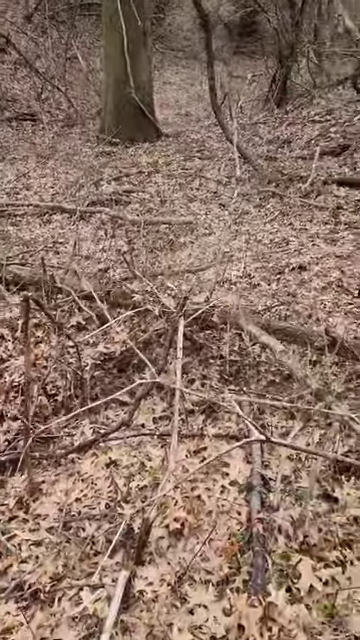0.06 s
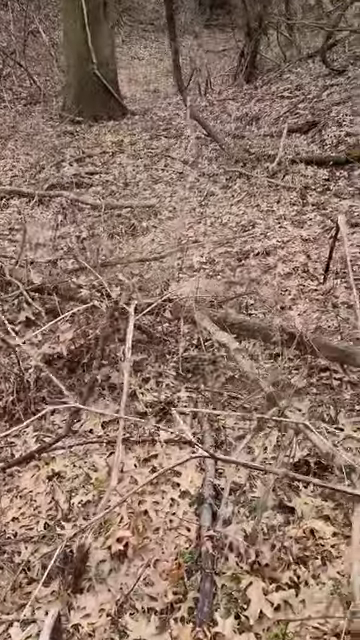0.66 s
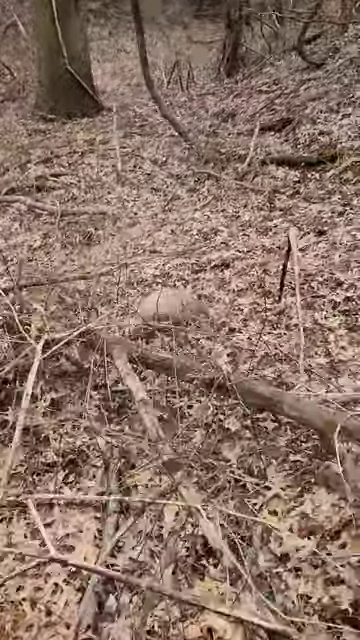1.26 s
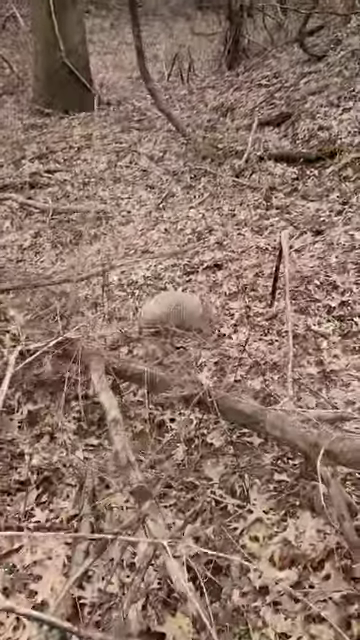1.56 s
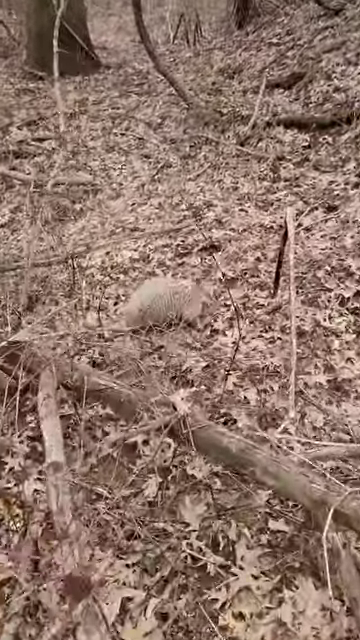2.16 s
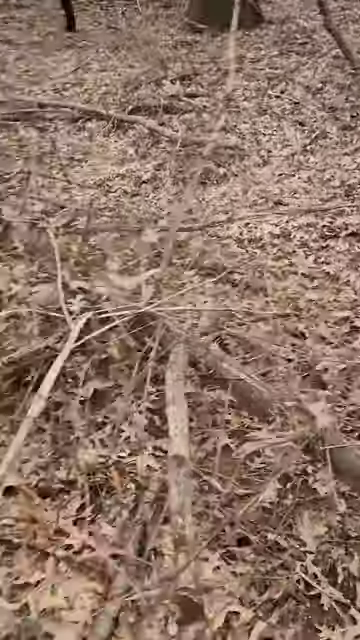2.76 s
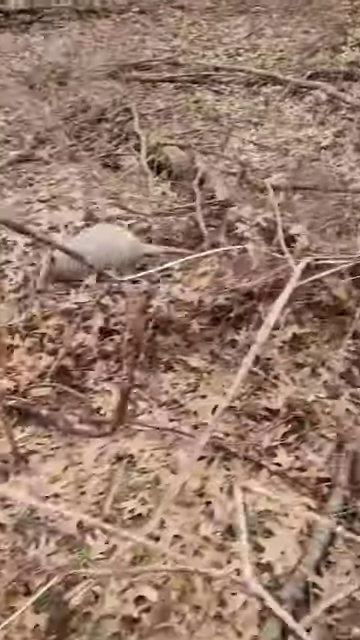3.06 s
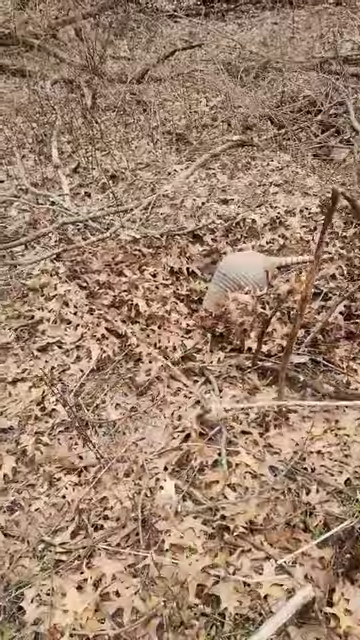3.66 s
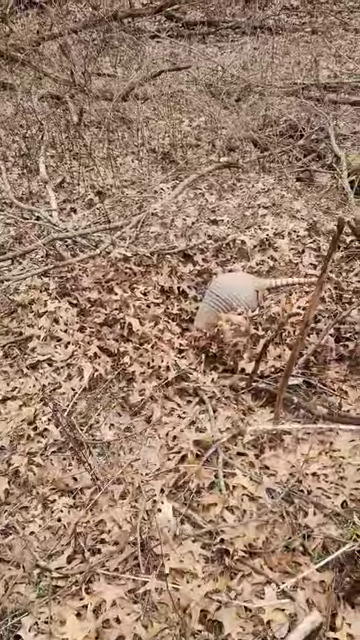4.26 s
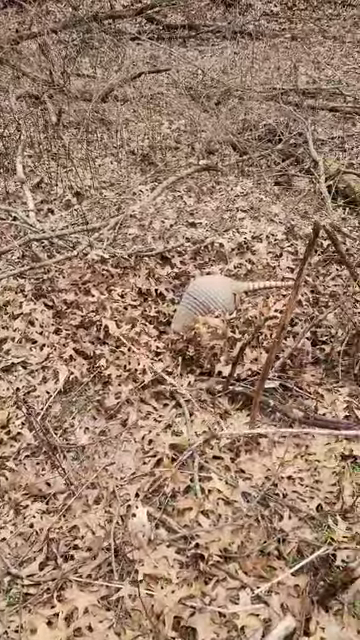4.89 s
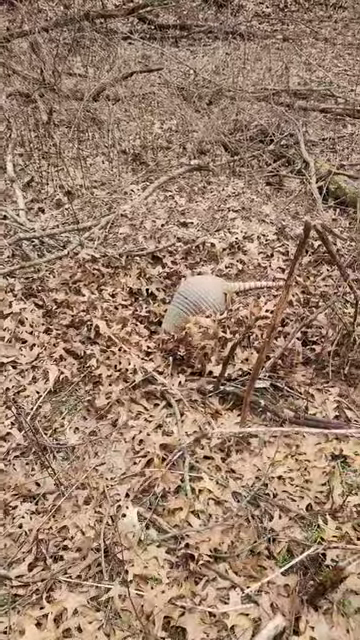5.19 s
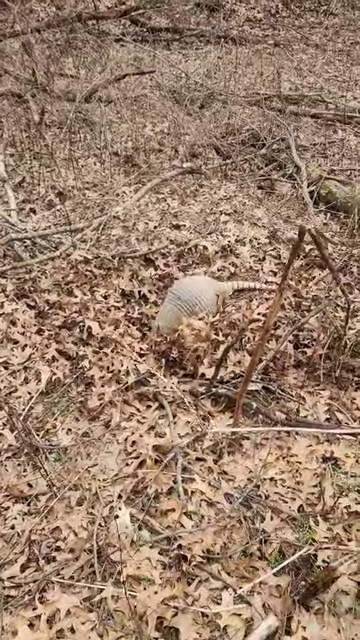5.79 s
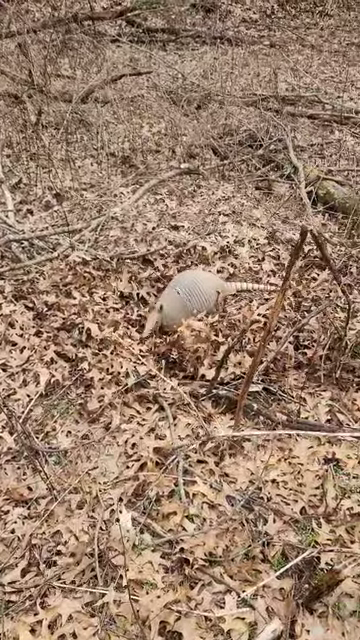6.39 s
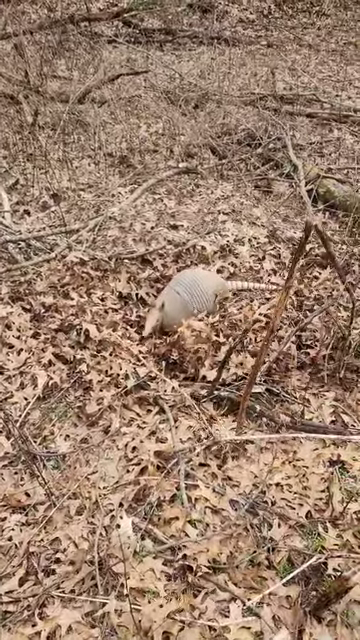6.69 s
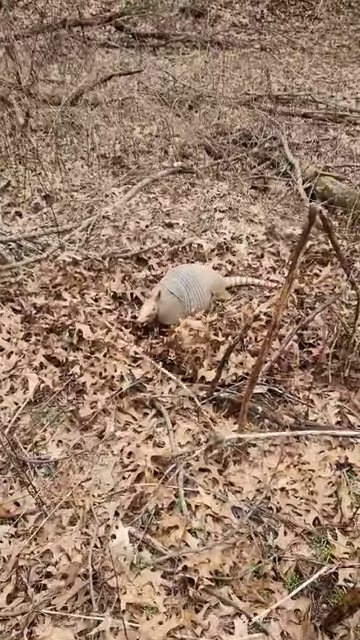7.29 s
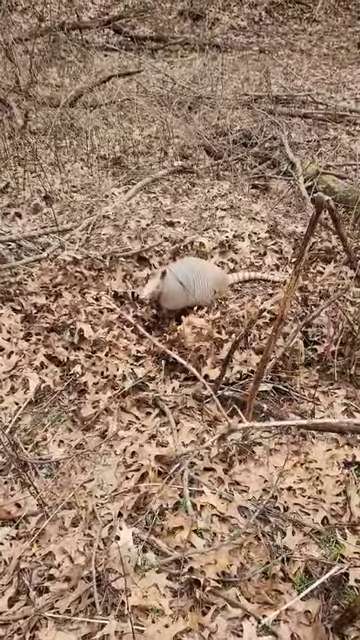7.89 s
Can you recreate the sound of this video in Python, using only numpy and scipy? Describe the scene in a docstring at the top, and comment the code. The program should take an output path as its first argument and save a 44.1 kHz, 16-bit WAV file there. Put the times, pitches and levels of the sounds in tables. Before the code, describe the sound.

In soft woodland air, someone wades through dry leaves right by the microphone, with a crackling hiss, snapping twigs and a few dull thuds. The walking peaks, then halts as a distant bird gives two faint, hoarse calls. Following a quiet pause, an armadillo rustles and scratches in the leaves in a run of quick, dry rasps, slowing slightly. Low rumble and light wind buffeting continue throughout.

```python
"""Dry oak leaves hiss and crunch as someone wades through them, twigs cracking underfoot.
The steps stop near an armadillo, which stirs the litter, then roots in it with short, rasping
thrusts that gradually slow down. The rustle is noise shaped by countless tiny leaf fractures.
A low rumble, puffs of wind and soft woodland air lie under it all, and a far bird calls twice."""
import sys
import numpy as np
from scipy import signal
from scipy.fft import rfft, irfft, next_fast_len
from scipy.io import wavfile
from scipy.ndimage import uniform_filter1d, map_coordinates

SR = 44100
rng = np.random.default_rng(int(sys.argv[2]) if len(sys.argv) > 2 else 0)


def to_wav(s):
    """Save 16-bit WAV."""
    ch = np.atleast_2d(s).T  # columns
    pcm = np.round(np.clip(ch, -1, 1) * 32767)  # PCM
    wavfile.write(sys.argv[1], SR, pcm.astype(np.int16))


N = 354563

# bright crack of a breaking stalk: (frequency [Hz], gain [dB])
CRACK_SPECTRUM = [(2500, -42.5), (4400, -1.5), (6000, -3.5), (7600, 7), (9000, 0.5), (11500, -18.5)]
# low end of the rumble and the wind puffs: (frequency [Hz], gain [dB])
RUMBLE_SPECTRUM = [(15, -37), (28, -1.5), (42, 0.5), (78, 2.5), (115, -4), (155, -12), (230, -29.5),
                   (400, -66)]
# slow drift of the ambience: (time [s], air level [dB], rumble level [dB])
AMBIENCE_LEVELS = [(0, -56, -41.5), (1.3, -57, -44), (2.5, -56.5, -46), (4.7, -59, -45), (8, -57, -43)]


def wading():
    """Feet sweep through the leaves: a crackling hiss, and a lower crunch as the layer is pressed."""
    # feet brushing leaves aside: (time at full strength [s], hold [s], level [dB])
    sweeps = [(0.0, 0.22, -47.5), (.19, 0.16, -39), (.48, 0.0067, -49), (.66, 0.095, -45.5),
              (.885, 0.11, -36), (1.07, 0.095, -40), (1.3, 0.11, -44), (1.46, .01, -40.5),
              (1.565, 0.089, -40.5), (1.81, 0.038, -40.5), (1.89, 0.094, -33), (2.05, 0.065, -36.5),
              (2.23, 0.0091, -35.5), (2.298, 0.012, -26.5), (2.47, 0.1, -29), (2.64, 0.038, -23.5),
              (2.74, 0.058, -31), (2.89, 0.16, -30), (3.115, 0.0069, -29), (3.22, 0.053, -32.5),
              (3.3, .12, -29.5), (3.5, 0.13, -40), (3.68, 0.0048, -34.5), (4.08, .04, -57.5),
              (4.48, 0.21, -64), (4.79, 0.03, -60), (4.98, .09, -57.5), (5.545, 0.0049, -60.5)]
    # weight coming down on the leaves: (time at full strength [s], hold [s], level [dB])
    steps = [(.12, 0.26, -55), (.66, 0.37, -57.5), (1.33, 0.3, -57.5), (1.86, 0.11, -53),
             (2.29, 0.02, -43.5), (2.47, 0.021, -42), (2.72, .32, -38.5), (3.11, 0.015, -37.5),
             (3.29, 0.022, -38.5), (3.45, 0.078, -50), (3.69, 0.024, -55)]
    # where the leaves move: (time [s], direction [0 = ahead, 1 = underfoot])
    directions = [(0, 0.89), (2.25, 0.63), (2.45, 0.046), (2.85, 0.047), (3.1, 0.41), (3.9, 1)]
    # brushed leaves: (frequency [Hz], gain [dB])
    hiss_spectrum = [(500, -14.5), (1500, -6), (2500, -7.5), (3300, -2.5), (5000, -3.5), (6300, -3.5),
                     (9500, -4), (11800, 0), (13700, -2), (15500, -4.5)]
    # pressed leaves: (frequency [Hz], gain [dB])
    crunch_spectrum = [(100, -29), (200, -9.5), (600, -1), (950, -9.5), (1400, -2), (2100, 2), (3200, 2),
                       (6000, -38)]
    arrival_s, fidget_db, dense_db, tilt_db_per_octave = 4.2, -66.5, -29, 2.07
    sweep = amp(pushes(sweeps, rise_db_per_s=239, fall_db_per_s=112, settle_db=-10))
    weight = amp(pushes(steps, rise_db_per_s=216, fall_db_per_s=146, settle_db=-5.5))
    below = np.clip(curves(directions)[0], 0, 1)
    standing = np.arange(N) / SR > arrival_s  # leaves still creak under the resting feet
    fidget = amp(fidget_db) * standing * crackle(rate=24, spread_db=0.5, life_s=0.006, bed=0.53)
    friction = 0.6 + (sweep / amp(dense_db)) ** 2  # strong sweeps merge into an even rush
    grains = crackle(rate=600, spread_db=3.3, life_s=0.00022, bed=friction) * amp(0.8 * wobble(60))
    front_spectrum = [(hz, db + tilt_db_per_octave * np.log2(hz)) for hz, db in hiss_spectrum]
    underfoot = unit(stereo_noise(grains, hiss_spectrum, lag_ms=0.4145, scatter=1.0) * pan(-3))
    in_front = unit(stereo_noise(grains, front_spectrum, lag_ms=-0.051, scatter=0.7) * pan(2.4))
    hiss = np.hypot(sweep, fidget) * (np.sqrt(below) * underfoot + np.sqrt(1 - below) * in_front)
    pressed = crackle(rate=500, spread_db=3.0, life_s=0.0004, bed=1.0)
    crunch = unit(stereo_noise(pressed, crunch_spectrum, lag_ms=0.018, scatter=0.089 + 0.5 * below))
    return spectral_flicker(hiss + weight * crunch, depth_db=2.2)


def twig_snaps():
    """A stalk breaks in about a millisecond; the wood sounds a little longer. Thinner is brighter."""
    # twigs and stalks: (time [s], level [dB], thinness [0 = stick, 1 = splinter], left over right [dB])
    breaks = [(0.051, -46, .65, -8), (0.1084, -32, 0.16, -4.5), (0.2017, -20, 0.54, -12),
              (.215, -27, 0.45, -5.5), (.24, -28.5, 0.84, -7.5), (0.318, -30.5, 0.42, -14),
              (0.8237, -36, 0.96, -14), (1.1028, -18, 0.62, -5), (1.1146, -19, 0.61, -1.5),
              (2.1121, -16.5, 0.69, -11.5), (2.1159, -14.5, 0.53, -6), (2.1301, -12.5, 0.62, -5.5),
              (2.1365, -18, 0.63, -11.5), (2.1517, -14.5, 0.73, -13), (2.1771, -8.5, 0.81, -1.5),
              (2.182, -11.5, 0.66, -1), (2.2485, -17, 1, -1), (2.275, -21, 0.86, -12),
              (2.3581, -15.5, 0.39, -1.5), (2.5313, -19.5, 0.96, 4), (2.8975, -19.5, 0.096, -2.5),
              (2.9, -17.5, 0.95, -3.5), (3.3353, -20, 1, -7), (3.9285, -28, 0.87, -14),
              (4.07, -42, 0.36, -2), (4.0958, -49, .8, -4), (4.681, -46, 0.35, -7.5),
              (4.958, -47, 0.97, -13.5), (5.038, -42.5, 0.69, -8), (5.5013, -44, 0.91, -9.5),
              (5.547, -38, .85, -7), (5.5883, -45, 0.97, -7), (5.6782, -54, .8, -7), (5.7526, -30, .0, 10),
              (5.94, -30.5, 0.95, -12), (5.974, -41, .85, -1.5), (5.988, -41, .9, -2),
              (6.1002, -38, 1, -1.5), (6.245, -28, 0.69, -2), (6.2508, -27.5, 0.83, -1.5),
              (6.257, -31, 1, -2.5), (7.2668, -38, 1, 0.5), (7.294, -36.5, 0.39, 5)]
    # body of a woody stick: (frequency [Hz], gain [dB])
    wood_spectrum = [(300, -8), (1100, -8), (2000, -1.5), (3200, -3), (4500, 0.5), (7000, -14.5)]
    # sizzle of a fine splinter: (frequency [Hz], gain [dB])
    splinter_spectrum = [(7000, -54), (10000, 10), (13000, 11.5), (16000, -5.5)]
    out, t = np.zeros((2, N)), np.arange(SR // 30) / SR
    sharp, woody = fracture(t, ring_s=0.0012, tail=0.11), fracture(t, ring_s=0.0008, tail=0.7)
    layers = [(woody, wood_spectrum), (sharp, CRACK_SPECTRUM), (sharp, splinter_spectrum)]
    layer_thinness = np.array([0, 0.6, 1])
    for start, db, thinness, pan_db in breaks:
        shares = amp(-22 * np.abs(thinness - layer_thinness))  # the closest layer leads
        snap = np.zeros((2, len(t)))
        for (envelope, spectrum), share in zip(layers, shares / np.linalg.norm(shares)):
            sound = stereo_noise(envelope, spectrum, lag_ms=-0.03 * pan_db, scatter=0.28)
            energy = np.sum(sound ** 2, axis=1, keepdims=True)
            snap += share * sound * np.sqrt(0.0039 * SR / energy)
        sides = pan(pan_db)
        add(out, start, amp(db) * snap * sides / np.sqrt(np.mean(sides ** 2)))
    return out


def foot_thuds():
    """Weight lands on soil or a stick: a broad, quickly damped resonance."""
    # ground and sticks giving way: (time [s], level [dB], pitch [Hz], 60 dB decay time [s])
    knocks = [(.109, -48, 520, 0.023), (1.1019, -33.5, 2150, 0.012), (1.878, -45, 445, 0.035),
              (2.153, -51.5, 298, 0.14), (2.176, -42, 368, 0.054), (2.3, -44, 494, 0.053),
              (2.7585, -18, 3170, 0.0053), (2.897, -28, 1370, 0.041), (2.898, -22.5, 2170, 0.015),
              (3.071, -47, 82, 0.27), (3.326, -34, 83, 0.1), (3.707, -38, 520, 0.015),
              (3.723, -39, 530, 0.012), (3.9285, -37, 2570, 0.0053)]
    out, t = np.zeros((2, N)), np.arange(SR // 5) / SR
    for start, db, hz, t60 in knocks:
        body = [(hz / 5, -32), (hz * 0.89, -10), (hz, 0),
                (hz * 1.22, -12), (hz * 3.9, -34), (hz * 14, -70)]
        blow = (1 - np.exp(-t / 0.0012)) * amp(-60 * t / t60)
        add(out, start, amp(db) * burst(blow, body, lag_ms=0, scatter=0.5, span_s=t60 / 4))
    return out


def armadillo_stirring():
    """The animal's body and claws keep the leaves ticking, a few metres ahead."""
    # shoves through the litter: (time at full strength [s], hold [s], level [dB])
    shoves = [(5.78, 0.19, -50.5), (5.95, 0.44, -49), (6.26, 0.12, -49.5), (6.5, 0.11, -54),
              (6.8, 0.088, -53), (7.18, 0.13, -52.5), (7.485, 0.057, -46.5)]
    # stirred litter: (frequency [Hz], gain [dB])
    litter_spectrum = [(300, -16), (900, -5), (1500, 0.5), (2400, 3), (3700, 6.5), (5000, 6), (7500, 0.5),
                       (10000, -2), (13200, 7.5), (15500, -3)]
    grains = crackle(rate=700, spread_db=3.0, life_s=0.00025, bed=1.5) * amp(0.8 * wobble(25))
    rustle = stereo_noise(grains, litter_spectrum, lag_ms=-0.1, scatter=1.0)
    movement = amp(pushes(shoves, rise_db_per_s=471, fall_db_per_s=315, settle_db=-10))
    return movement * unit(spectral_flicker(rustle, depth_db=1.6))


def armadillo_rooting():
    """Each thrust ticks, then swells into a rasp; under damp leaves a hollow resonance falls in pitch."""
    # thrusts into the leaves: (time [s], length [s], level [dB], dryness as extra hiss [dB])
    thrusts = [(6.129, 0.018, -44, -1.5), (6.247, 0.023, -41.5, 1.5), (6.349, 0.023, -44, -3),
               (6.464, 0.033, -41, -2.5), (6.586, .028, -42, -4), (6.706, 0.034, -44, -4.5),
               (6.842, 0.023, -47, -4), (6.972, 0.031, -45, -3), (7.127, 0.03, -39.5, -0.5),
               (7.41, 0.046, -39.5, 1.5), (7.556, 0.029, -44, 2.5), (7.679, 0.031, -46.5, 0.5),
               (7.833, 0.029, -43.5, 2), (8, 0.028, -45.5, 1.5)]
    # midrange of the rasp: (frequency [Hz], gain [dB])
    rasp_spectrum = [(200, -29), (450, 1), (700, -11), (1000, -7.5), (1500, -0.5), (2600, -0.5), (3500, -4),
                     (5000, -14)]
    # its dry top end: (frequency [Hz], gain [dB])
    hiss_spectrum = [(2000, -29), (3800, -9), (4800, 7.5), (6200, 4), (7700, 5), (9500, -17), (12500, 3.5),
                     (15500, 3)]
    # noise bands around the gliding resonances: (offset [Hz], gain [dB])
    scrape_band, hollow_band = [(80, -4), (220, -9), (700, -47)], [(50, -9), (160, -31.5), (1000, -84)]
    out, t = np.zeros((2, N)), np.arange(SR // 10) / SR
    glide_hz = 440 + 520 * np.exp(-t / 0.0189)
    grit = crackle(rate=900, spread_db=2.5, life_s=0.00025, bed=1.0)
    for start, length, db, dry_db in thrusts:
        swell = (1 - np.exp(-t / 0.0075)) * np.exp(-(t / length) ** 4)
        stroke = swell * np.roll(grit, -round(start * SR))[:len(t)]
        phase = 2 * np.pi * np.cumsum(glide_hz * rng.lognormal(0, 0.0664)) / SR  # no two hollows alike
        scrape = np.cos(2.05 * phase) * burst(stroke, scrape_band, lag_ms=0, scatter=0.3, span_s=0.015)
        rasp = burst(stroke, rasp_spectrum, lag_ms=-0.1, scatter=0.35, span_s=0.014)
        rasp = spectral_flicker(rasp, depth_db=4.5)
        hollow = np.cos(phase) * burst(swell, hollow_band, lag_ms=0, scatter=0.22, span_s=0.022)
        hiss = burst(stroke * np.exp(-t / 0.15), hiss_spectrum, lag_ms=-0.1, scatter=0.5, span_s=0.017)
        attack = fracture(t, ring_s=0.0011, tail=0.16)
        tick = burst(attack, CRACK_SPECTRUM, lag_ms=-0.086, scatter=0.64, span_s=0.0011)
        body = amp(-6) * rasp + amp(-9.5) * scrape + amp(-10 - 1.06 * dry_db) * hollow
        bright = (amp(dry_db) * hiss + amp(1 + 4.1 * dry_db) * tick) * pan(6)
        add(out, start, amp(db) * (body + bright))
    return out


def far_bird():
    """Two hoarse, arching calls: a fast flutter spreads the tone into a narrow band."""
    # arch of one note: (time into the note [s], pitch [Hz], relative level [dB])
    note = [(0, 1264, -14), (.04, 1396, -2), (.08, 1530, -5), (.11, 1440, 0), (0.141, 1400, -11)]
    # the calls: (time [s], relative level [dB])
    calls = [(3.522, -42), (3.895, -40)]
    knots, pitch_hz, shape_db = np.transpose(note)
    out, t = np.zeros((2, N)), np.arange(round(knots[-1] * SR)) / SR
    for start, db in calls:
        jitter, flutter = wobble(347)[:len(t)], wobble(270)[:len(t)]
        hz = np.interp(t, knots, pitch_hz) * (1 + 0.06 * jitter)
        envelope = amp(db + np.interp(t, knots, shape_db)) * (1 + 0.26 * flutter)
        add(out, start, envelope * np.sin(2 * np.pi * np.cumsum(hz) / SR) * pan(0))
    return out


def wind_puffs():
    """Puffs of wind buffet the two microphone ports, each largely on its own."""
    # bell-shaped puffs: (peak time [s], half-width [s], level [dB])
    gusts = [(2.25, 0.15, -59), (3.1, 0.06, -38.5), (3.35, 0.13, -48), (4.35, 0.083, -44),
             (5.301, 0.24, -51.5), (6.45, 0.25, -47), (6.95, 0.097, -37.5)]
    t = np.arange(N) / SR
    swells = sum(amp(db) * np.exp(-((t - peak) / width) ** 2 / 2) for peak, width, db in gusts)
    return swells * unit(stereo_noise(amp(0.84 * wobble(9.7)), RUMBLE_SPECTRUM, lag_ms=0, scatter=1.2))


def far_rumble():
    """A lumpy low rumble, nearly alike on both sides."""
    _, level_db = curves(AMBIENCE_LEVELS)
    lumps = amp(0.99 * wobble(9))
    return amp(level_db) * unit(stereo_noise(lumps, RUMBLE_SPECTRUM, lag_ms=0, scatter=0.083))


def woodland_air():
    """Air in the trees makes a soft, breathing wash, a little to the left."""
    # tone of the wash: (frequency [Hz], gain [dB])
    air_spectrum = [(100, -5), (240, -2), (360, 4), (480, -1.5), (700, -1.5), (1000, -7.5), (1600, -15.5),
                    (2400, -9.5), (3800, -25), (7500, -23), (15500, -31)]
    level_db, _ = curves(AMBIENCE_LEVELS)
    wash = stereo_noise(amp(2.0 * wobble(2.36)), air_spectrum, lag_ms=0.13, scatter=0.65)
    return amp(level_db) * unit(wash) * pan(2.5)


def forest_reverb(x):
    """Trunks scatter a thin tail that lingers in the midrange; its treble dies first."""
    # decay among the trees: (frequency [Hz], 60 dB decay time [s])
    decay_times = [(200, 0.24), (1500, 1), (5000, 0.24), (14000, 0.028)]
    hz, t, bins = signal.stft(rng.standard_normal((2, SR // 2)), SR, nperseg=256)
    tail = signal.istft(bins * amp(-60 * t / along(decay_times, hz)[:, None]), SR, nperseg=256)[1]
    return signal.fftconvolve(x, tail / np.linalg.norm(tail[0]), axes=1)[:, :N]


def crackle(rate, spread_db, life_s, bed):
    """Envelope of tiny leaf fractures of random size, rate a second, over a bed of sliding friction."""
    sizes = amp(spread_db * np.minimum(rng.standard_exponential(N), 4))
    fractures = sizes * (rng.random(N) < rate / SR)
    pole = np.exp(-2 / (life_s * SR))
    power = signal.lfilter([1], np.poly([pole, pole]), fractures ** 2)  # each swells, then dies
    return np.sqrt(np.abs(power / power.mean()) + abs(bed))


def fracture(t, ring_s, tail):
    """Envelope of a break: fibres give way and stop short, nearby leaves scatter a faint tail."""
    onset = 1 - np.exp(-(t / 0.0006) ** 2)
    return onset * (np.exp(-(t / ring_s) ** 4) + tail * np.exp(-t / 0.0033))


def pushes(rows, rise_db_per_s, fall_db_per_s, settle_db):
    """Level in dB of pushed leaves: each push rises, holds and falls, then the leaves slide back."""
    settle_db_per_s = 49.5
    t = np.arange(0, N, 64) / SR
    peak, hold, db = np.transpose(rows)[:, :, None]
    early, late = np.maximum(peak - t, 0), np.maximum(t - peak - hold, 0)
    release = np.maximum(amp(-fall_db_per_s * late), amp(settle_db - settle_db_per_s * late))
    power = np.sum((amp(db - rise_db_per_s * early) * release) ** 2, axis=0)
    return np.interp(np.arange(N) / SR, t, 10 * np.log10(power + 1e-14))


def spectral_flicker(x, depth_db):
    """Random brief, narrow peaks and dips come and go, giving the rustle a patchy colour."""
    bins = signal.stft(x, nperseg=512)[2]
    patches = uniform_filter1d(rng.standard_normal(bins.shape[-2:]), size=4, axis=0)
    patches = uniform_filter1d(patches, size=5, axis=1)
    return signal.istft(bins * amp(depth_db * patches / patches.std()), nperseg=512)[1][..., :x.shape[-1]]


def port_response(hz):
    """Each microphone port rings in the treble, the right one more."""
    # port resonances: (centre [Hz], width [Hz], left gain [dB], right gain [dB])
    resonances = [(5040, 1100, 1.5, 2.5), (7820, 1320, 4.5, 9), (12140, 3500, -5.5, 6)]
    return amp(sum(np.outer([left, right], 1 / (1 + (2 * (hz - centre) / width) ** 2))
                   for centre, width, left, right in resonances))


def stereo_noise(envelope, spectrum, lag_ms, scatter):
    """Shaped noise at both ports: a direct part, lag_ms later on the left, plus scattered sound."""
    noise = envelope * rng.standard_normal((3, len(envelope)))
    direct = filtered(noise[0], lambda hz: np.exp(np.outer([-1j, 1j], np.pi * hz * lag_ms / 1000)))
    return filtered(direct + scatter * noise[1:], lambda hz: port_response(hz) * amp(along(spectrum, hz)))


def burst(envelope, spectrum, lag_ms, scatter, span_s):
    """A short noise with the energy of rms 1 held for span_s."""
    return unit(stereo_noise(envelope, spectrum, lag_ms, scatter)) * np.sqrt(span_s * SR / len(envelope))


def amp(db):
    """Decibels to gain."""
    return 10 ** (np.asarray(db) / 20)


def pan(db):
    """Stereo gains with the left db above the right."""
    return amp([[db / 2], [-db / 2]])


def unit(x):
    """Scale so that the mid signal has rms 1."""
    return x / np.sqrt(np.mean(np.atleast_2d(x).mean(0) ** 2) + 1e-20)


def along(points, hz):
    """Interpolate (frequency, value) points on a log axis."""
    knots, values = np.transpose(points)
    return np.interp(np.log(hz + 1), np.log(knots + 1), values)


def curves(rows):
    """One value per sample for each column after the time."""
    times, *columns = np.transpose(rows)
    return [np.interp(np.arange(N) / SR, times, column) for column in columns]


def wobble(rate):
    """A smooth random curve, rate knots a second."""
    return map_coordinates(rng.standard_normal(int(N * rate / SR) + 4), [np.arange(N) * rate / SR])


def filtered(x, response):
    """Apply a complex frequency response."""
    n = x.shape[-1]
    padded = next_fast_len(n + 2048)
    return irfft(rfft(x, padded) * response(np.fft.rfftfreq(padded, 1 / SR)), padded)[..., :n]


def add(track, start_s, sound):
    """Mix a short stereo sound in at start_s."""
    part = track[:, max(0, round(start_s * SR)):][:, :sound.shape[1]]
    part += sound[:, :part.shape[1]]


def scene():
    """Feet and animal are close and almost dry; the bird carries more of the wood's echo."""
    near = wading() + armadillo_stirring() + armadillo_rooting() + twig_snaps() + foot_thuds()
    bird = far_bird()
    echo = forest_reverb(amp(-19) * near + amp(-22) * bird)
    return near + amp(-9) * bird + echo + wind_puffs() + far_rumble() + woodland_air()


def record(dry):
    """Peaks are rounded off at full scale, then a steep low-pass trims the very top."""
    cutoff_hz = 15600
    rounded = dry / (1 + np.abs(dry) ** 6) ** (1 / 6)
    return filtered(rounded, lambda hz: 1 / np.sqrt(1 + (hz / cutoff_hz) ** 160))


dry = scene()
out = record(dry)
to_wav(out)
```